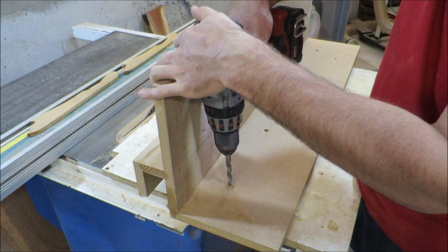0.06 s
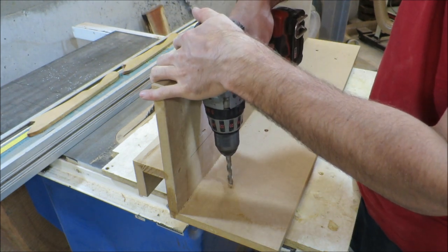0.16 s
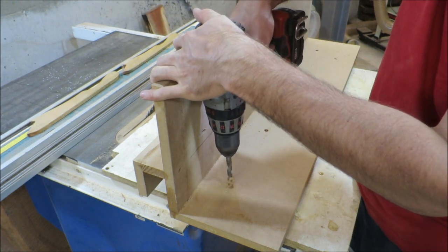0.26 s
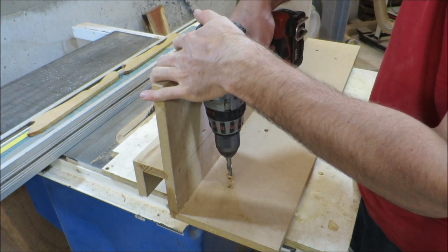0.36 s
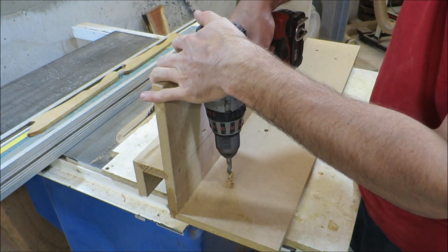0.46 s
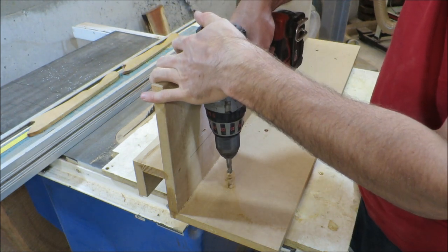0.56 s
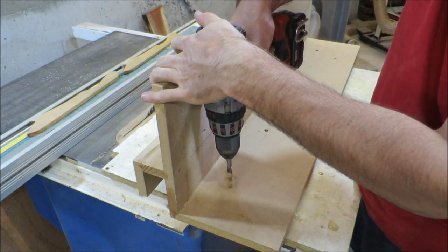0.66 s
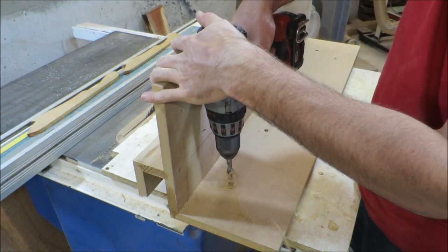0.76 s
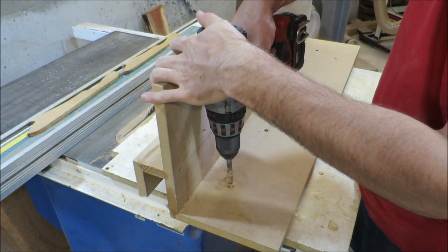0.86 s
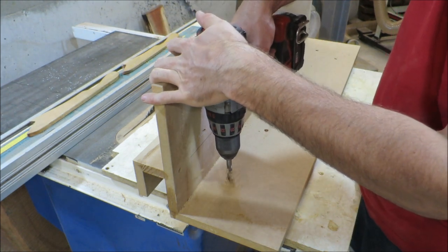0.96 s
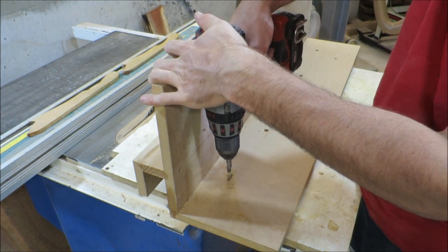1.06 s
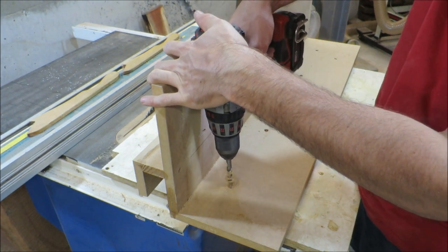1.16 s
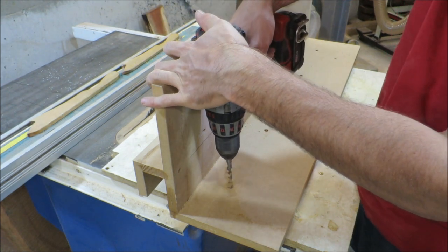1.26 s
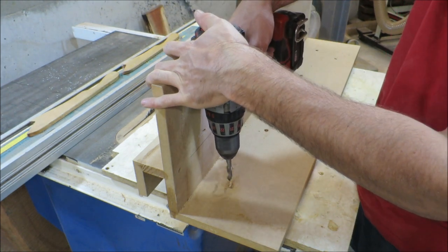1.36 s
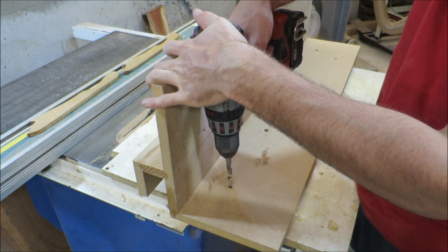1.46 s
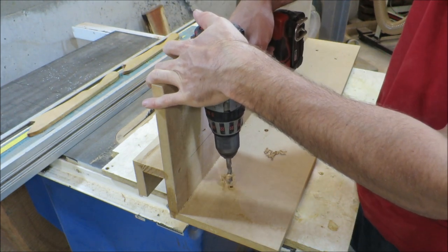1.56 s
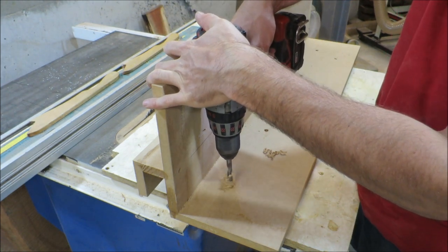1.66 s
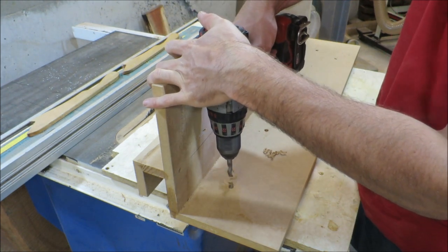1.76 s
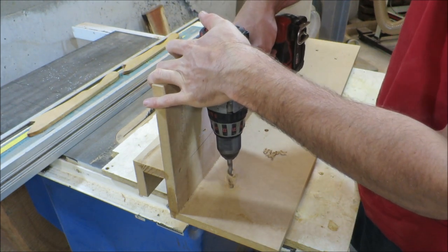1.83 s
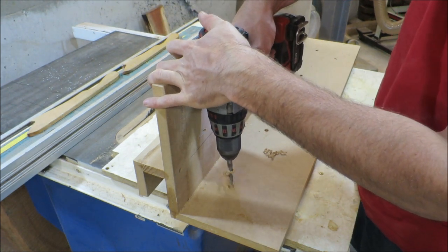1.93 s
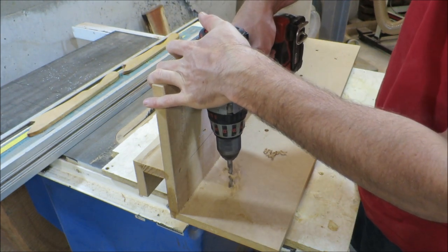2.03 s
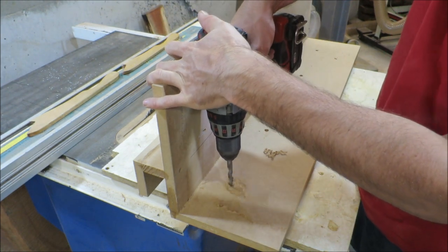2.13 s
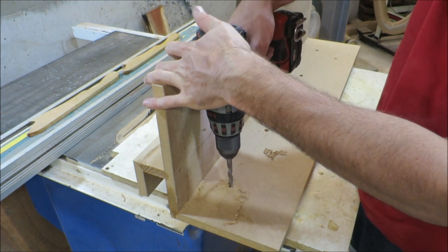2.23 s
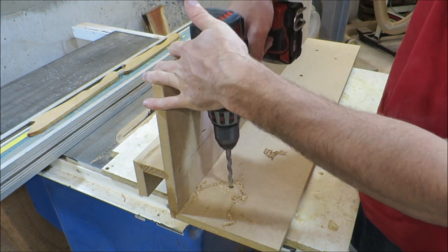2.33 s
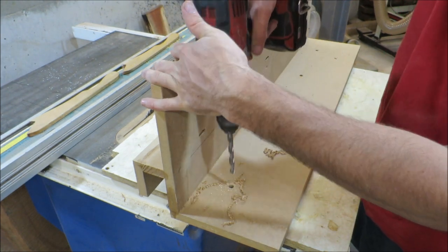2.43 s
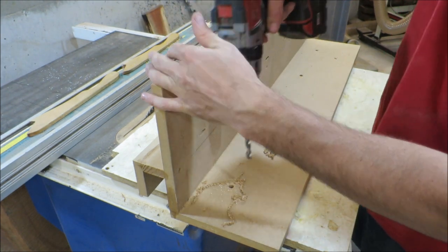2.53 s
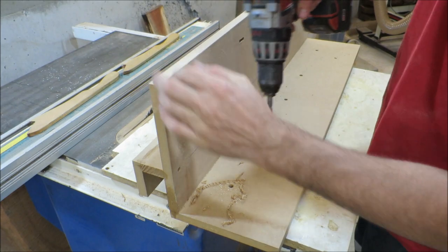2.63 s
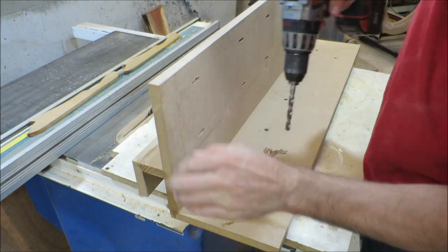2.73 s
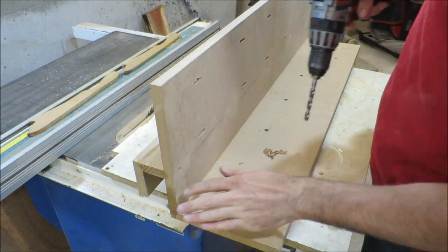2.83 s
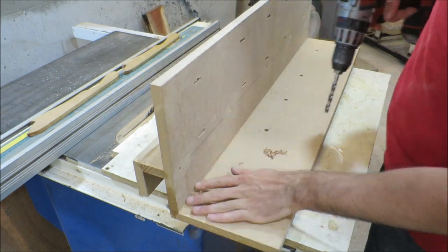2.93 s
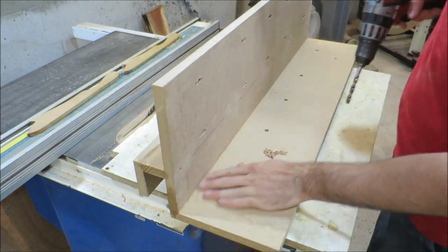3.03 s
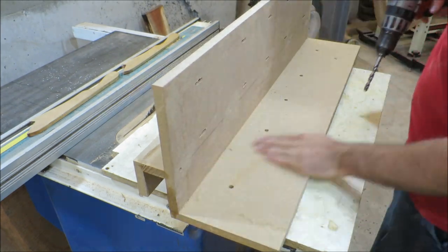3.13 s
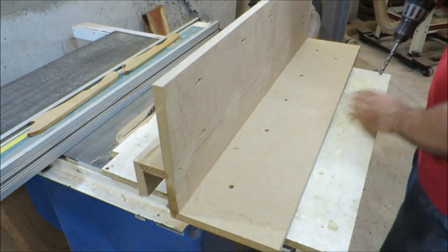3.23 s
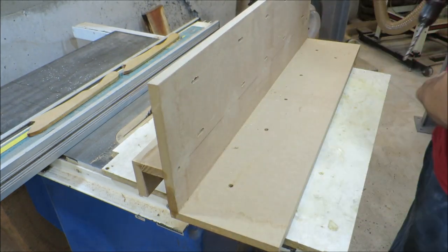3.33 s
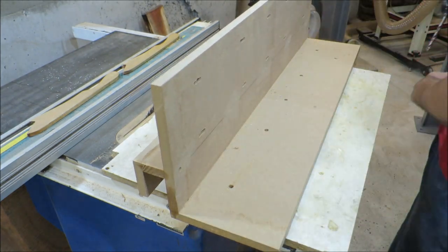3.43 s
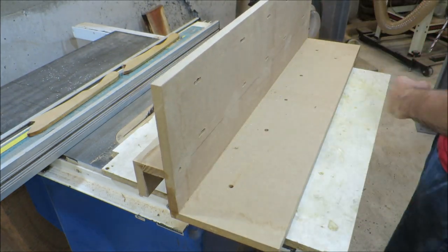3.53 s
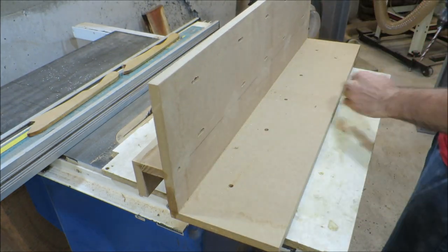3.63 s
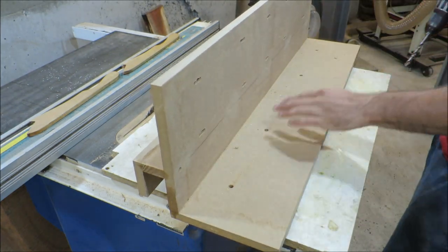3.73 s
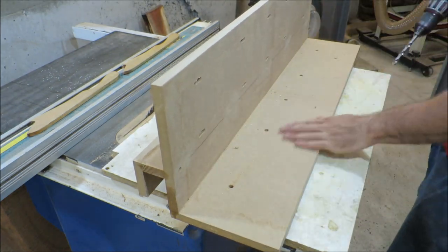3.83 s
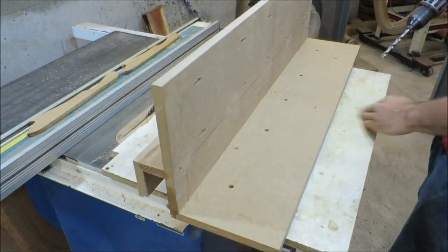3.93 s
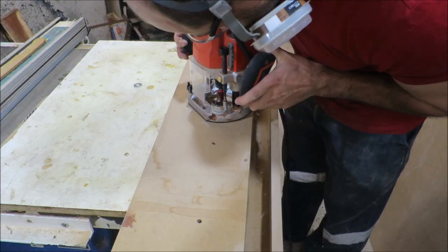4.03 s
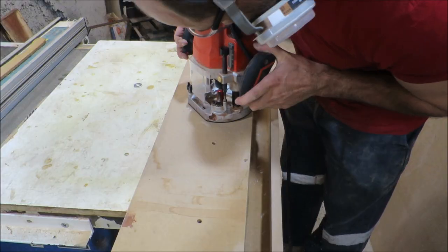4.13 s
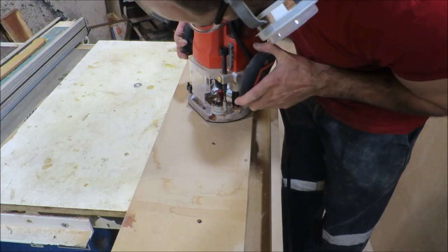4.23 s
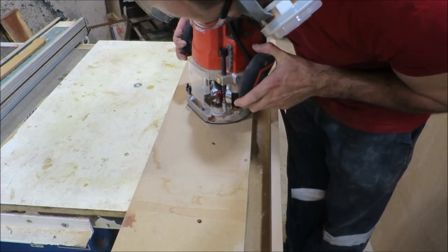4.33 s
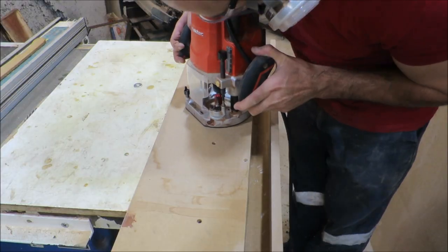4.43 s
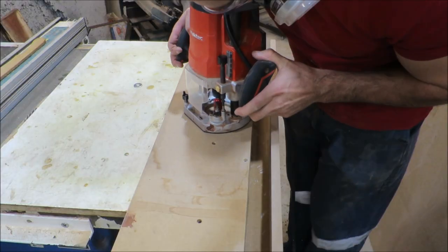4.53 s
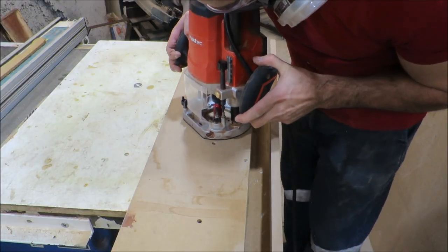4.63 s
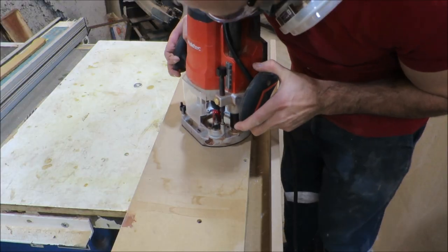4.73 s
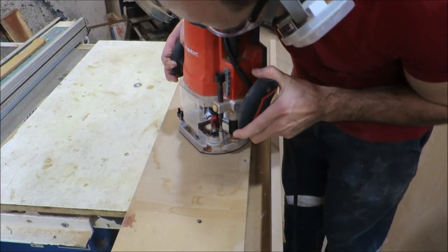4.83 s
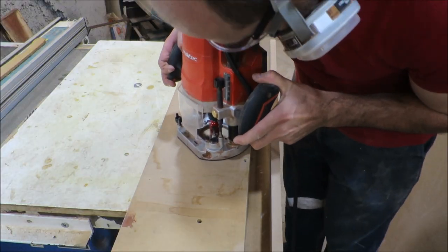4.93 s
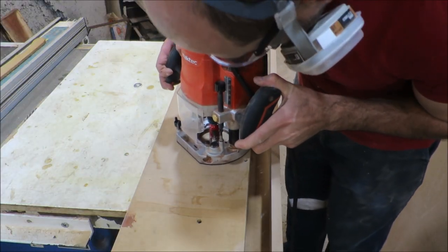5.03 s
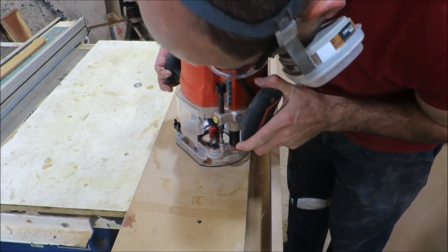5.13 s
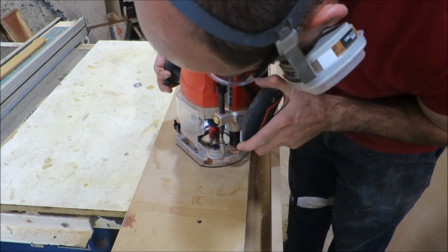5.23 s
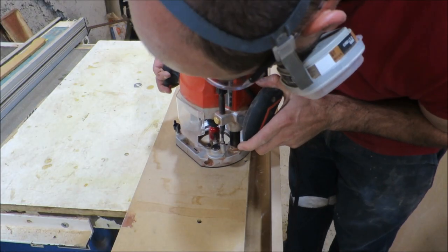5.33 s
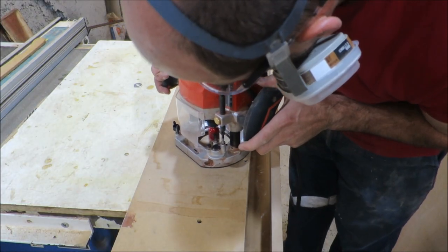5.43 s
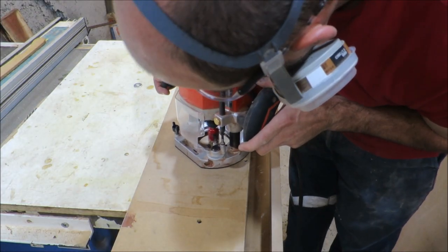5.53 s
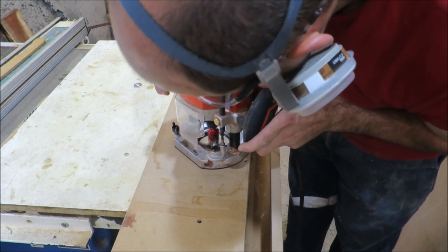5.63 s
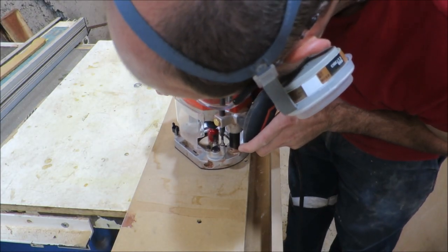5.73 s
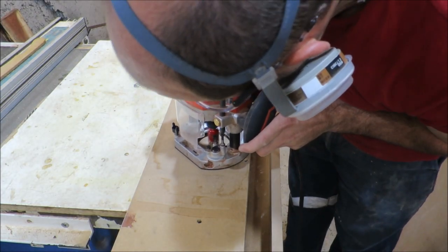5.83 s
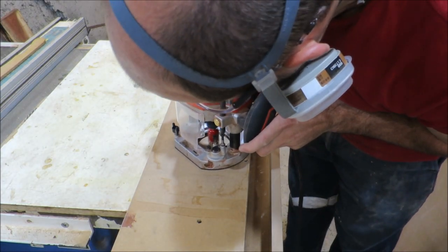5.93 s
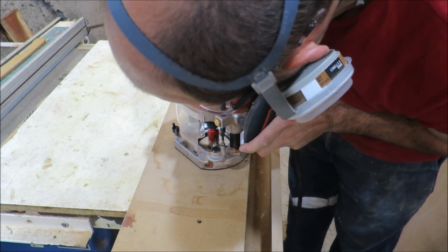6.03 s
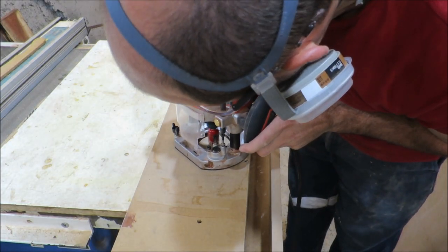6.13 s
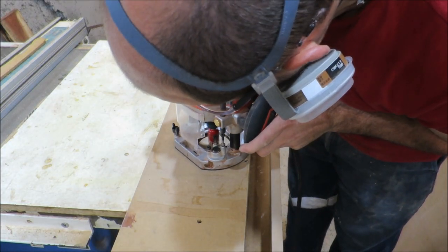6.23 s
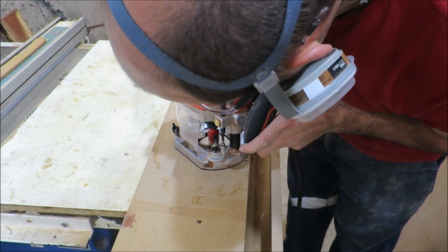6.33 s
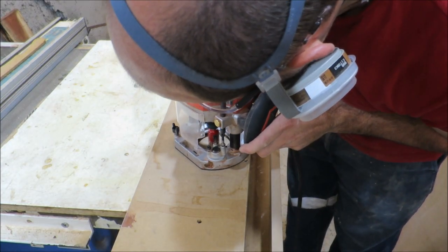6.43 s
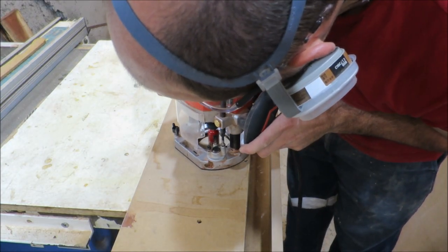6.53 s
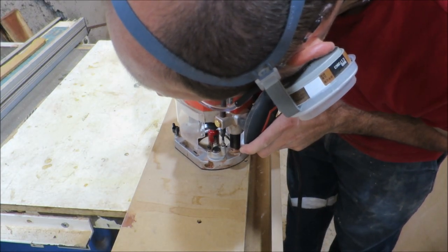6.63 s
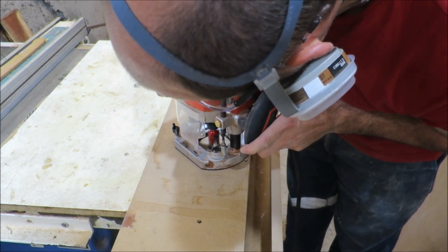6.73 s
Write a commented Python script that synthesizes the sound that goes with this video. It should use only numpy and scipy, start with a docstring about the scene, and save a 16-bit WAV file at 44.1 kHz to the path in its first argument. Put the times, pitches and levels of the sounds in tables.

```python
"""Cordless drill and plunge router

A drill bores into plywood, backs out and brakes: its gears whine at orders of the shaft speed while
the bit drives the board's modes. A palm slaps the board and wipes off the chips with a friction hiss.
The scene then cuts to a router, whose fan roars through resonant vents as its speed creeps up.
Both tools are heard close by, in stereo, in a workshop."""
import sys
import numpy as np
from scipy import signal
from scipy.io import wavfile
from scipy.ndimage import uniform_filter1d

SR = 44100
rng = np.random.default_rng(int(sys.argv[2]) if len(sys.argv) > 2 else 0)


def generate_wav(signal):
    """Clip the signal to [-1, 1] and save it as 16-bit WAV at the path in sys.argv[1]."""
    frames = np.transpose(np.atleast_2d(signal))
    scaled = np.clip(frames, -1, 1) * 32767
    pcm = np.round(scaled).astype(np.int16)
    wavfile.write(sys.argv[1], SR, pcm)


N = 298557
CUT_S = 4.149  # the router scene begins
FRAME, HOP = 2048, 512

# Stereo images, two lists each: (f/Hz, side minus mid/dB) and (f/Hz, left minus right/dB)
AT_DRILL = [(60, -17), (120, -16), (240, -16), (480, -17.5), (950, -14), (1890, -19.5), (3770, -18),
            (7520, -5), (15000, -2.5)], [(60, 0.0), (240, -2), (950, -0.5), (3770, -0.5), (15000, -0.5)]
AT_ROUTER = [(60, -18), (120, -31), (240, -15), (480, -19), (950, -11.5), (1890, -22), (3770, -11.5),
             (7520, -5), (15000, -1)], [(60, 0.0), (240, -1.1), (950, -0.7), (3770, -0.42), (15000, -0.5)]
AT_HAND = [(60, -9), (180, 9), (550, 5), (1650, -9), (4970, -9), (15000, 1)], [(60, 0.0), (380, -1.0),
           (2380, -0.54), (15000, -0.5)]

# Run of the drill motor: t/s, shaft f/Hz, boost of the strong orders/dB
MOTOR = [(0.0, 350, -1), (0.05, 351, 0.5), (0.2, 353.9, 0), (0.38, 350, -1), (0.58, 350.3, -0.5),
         (0.73, 355, -1.5), (1.11, 365.0, 0.5), (1.22, 373.4, 0.5), (1.45, 404.4, -3), (1.56, 416.2, -0.5),
         (1.77, 425.4, 1.5), (1.85, 424.2, 1.5), (1.89, 421, 1.5), (2.05, 392.6, 2), (2.15, 387.4, -1.5),
         (2.26, 385.2, 0), (2.41, 402, -2.5), (2.44, 401.9, 0), (2.47, 387.3, 7.5), (2.51, 360.9, 5),
         (2.528, 345.0, 4), (2.61, 305, 1)]
# Strong orders: multiple of the shaft speed
WHINE_ORDERS = (5, 10, 13, 15, 17, 20, 22, 25, 27)
# Each strong order off resonance: level/dB
WHINE_DB = (-41.5, -43, -44.5, -37.5, -42, -40.5, -42, -42.5, -44)
# Weaker gear and armature tones: order, level/dB
GEAR_TONES = [(4, -52.5), (7, -48.5), (8, -46.5), (8.5, -44), (9, -46.5), (9.5, -44), (10.5, -47.5),
              (12, -42.5), (12.5, -51.5), (13.5, -45), (14, -42.5), (14.5, -44), (15.5, -41.5), (16, -40.5),
              (16.5, -55), (17.5, -54), (18.5, -44), (19.5, -52), (20.5, -47), (21, -45.5), (22.5, -40),
              (23, -47), (23.5, -41), (25.5, -44.5), (26, -43.5), (27.5, -44.5), (28, -45), (30, -50),
              (32, -46.5), (33.5, -51), (37, -75)]
# Envelope of all other whole and half orders: order, level/dB
ORDER_FLOOR = [(3, -58), (10, -56.5), (16, -53), (24, -49), (35, -47), (44, -51)]
# Resonances of the drill's shell: f/Hz, width/Hz, boost/dB
SHELL_MODES = [(1607, 94, 11), (1759, 8, 9.5), (2079, 75, 10), (3493, 62, 10.5), (4001, 140, 13.5),
               (5320, 290, 8.5), (5674, 250, 12.5), (5978, 320, 10), (6313, 200, 4), (6986, 35, 10.5),
               (8060, 330, 6.5), (8800, 380, 5), (9410, 120, 11), (10750, 660, 9)]
def drill_whine():
    """Gear meshing: shaft orders swell at resonances; a gear repeating every second turn adds halves."""
    t = np.arange(round(MOTOR[-1][0] * SR)) / SR
    shaft_hz, boost_db = curves(MOTOR, t)
    shaft_hz = uniform_filter1d(shaft_hz, size=1300)  # the rotor's inertia rounds every change
    slowing_hz_per_s = np.clip(-uniform_filter1d(np.gradient(shaft_hz) * SR, size=1500), 0, 600)
    coast_db = -slowing_hz_per_s / 60  # tones sink as the motor coasts
    rattle = .22 + slowing_hz_per_s / 1400  # unloaded gears chatter and smear their tones
    wavers_db = 1.5 * np.real(drift(t, per_s=12, count=len(WHINE_DB)))
    whine = 0
    for order, db, waver_db in zip(WHINE_ORDERS, WHINE_DB, wavers_db):
        hz = order * shaft_hz
        level_db = db + boost_db + .05 * order * coast_db + waver_db + swell_db(SHELL_MODES, hz)
        whine += tone(t, hz, level_db, AT_DRILL, diffuse=rattle, per_s=70)
    weak_db = dict(GEAR_TONES)
    for order in np.arange(2 * ORDER_FLOOR[0][0], 2 * ORDER_FLOOR[-1][0]) / 2:
        if order not in WHINE_ORDERS and order * shaft_hz.max() < .45 * SR:
            weak_db.setdefault(order, spectrum(ORDER_FLOOR, order) + 2 * (order % 1 == 0))
    for order, db in weak_db.items():
        hz = order * shaft_hz
        level_db = db + coast_db + .15 * swell_db(SHELL_MODES, hz)
        whine += tone(t, hz, level_db, AT_DRILL, diffuse=.78, per_s=12.2)
    low_hz = 1.5 * shaft_hz  # heard only while it meets a mode of the board
    low_tone = tone(t, low_hz, coast_db - 57.5, AT_DRILL, diffuse=.32)
    whine += resonances(BOARD_MODES[1:2], low_hz) * low_tone
    fade_out = np.clip((t[-1] - t) / .013, 0, 1)
    return starting_at(0, whine * fade_out)


# Last whine under braking: t/s, f/Hz, level/dB
BRAKE_GLIDE = [(2.6, 1518, -40), (2.612, 1437, -46), (2.63, 765, -36), (2.65, 704, -50), (2.7, 695, -67)]
def drill_brake():
    """Deceleration: pitch follows shaft speed, so braking gives a short falling glide."""
    t = np.arange(round(BRAKE_GLIDE[0][0] * SR), round(BRAKE_GLIDE[-1][0] * SR)) / SR
    glide = tone(t, *curves(BRAKE_GLIDE, t), AT_DRILL, diffuse=.86, per_s=68)
    return starting_at(t[0], glide * signal.windows.tukey(len(t), .2))


# Air and gear hiss: f/Hz, relative spectral level/dB
DRILL_HISS = [(410, -30), (700, -25), (873, -6.5), (1490, -5.5), (1610, 1.5), (2250, -4.5), (2700, -0.5),
              (4960, 0.5), (5800, -1), (7420, -4.5), (12600, -0.5), (14800, -17.5), (15600, -5)]
# Modes of the plywood board: f/Hz, width/Hz, level/dB
BOARD_MODES = [(267, 59, -9), (527, 71, 1.5), (847, 100, -8), (628, 560, -4.5), (370, 61, -7.5)]
# Growl of the bit rubbing in its hole: t/s, level/dB
BIT_FRICTION = [(0, -46.5), (1.1, -48), (1.21, -45), (1.35, -52.5), (1.75, -49), (1.95, -42), (2.02, -37),
                (2.27, -42), (2.45, -51.5), (2.63, -59)]
# Rumble of the bench: t/s, level/dB
BENCH_RUMBLE = [(0, -51), (.5, -53.5), (1.4, -60), (1.75, -57.5), (1.83, -60), (2.35, -59), (2.63, -63)]
def boring(stop_s=2.628, rundown_db_per_s=298):
    """Forced vibration: the bit shakes board and bench, under air and gear hiss pulsing once a turn."""
    hz, t = grid()[0], np.arange(N) / SR
    growl_db = curves(BIT_FRICTION, t)[0]
    load_db = growl_db + 46.5  # relative to the usual friction
    moan_db = -46.5 + 1.36 * load_db  # follows the growl, but swings wider
    hiss_db = -30 + .034 * load_db + 4 * np.exp(-t / .16)  # surges as the bit enters
    turns = np.cumsum(curves(MOTOR, t)[0]) / SR
    end_s = stop_s + .5
    hiss = noise(amp(spectrum(DRILL_HISS, hz)), AT_DRILL, patchy_db=1.5, until=end_s)
    hiss *= 1 + .14 * np.cos(2 * np.pi * turns)
    growl = noise(resonances(BOARD_MODES[2:], hz), AT_DRILL, patchy_db=2.5, until=end_s)
    moan = noise(resonances(BOARD_MODES[:2], hz), AT_DRILL, patchy_db=2.7, until=end_s)
    bench_response = resonances([(168.7, 17.5, -.2), (280, 95, -.8)], hz)
    rumble = amp(curves(BENCH_RUMBLE, t)[0]) * noise(bench_response, AT_DRILL, patchy_db=2, until=end_s)
    rundown = amp(-rundown_db_per_s * np.clip(t - stop_s, 0, 1))  # once the brake bites
    return rundown * (amp(hiss_db) * hiss + amp(growl_db) * growl + amp(moan_db) * moan + rumble)


# Fan roar with the worker upright: f/Hz, relative spectral level/dB
ROAR_UPRIGHT = [(24, -63), (40, -29), (260, -15.5), (351, -8.5), (485, -4.5), (671, -2.5), (905, -5.5),
                (1000, 4), (1350, 0), (1690, -2.5), (2450, 3), (2850, 0.5), (3230, 3), (12400, -4),
                (15600, -13.5)]
# Fan roar with the worker bent over the machine: f/Hz, relative spectral level/dB
ROAR_BENT_OVER = [(24, -70), (40, -55), (280, -16), (359, -18.5), (428, -14), (654, -10.5), (1350, -4.5),
                  (1450, -6), (1730, -7.5), (2520, -2.5), (4690, -5), (6030, -5), (9680, -10), (12400, -8),
                  (15600, -15.5)]
# The worker leans in: t/s, share of the bent-over spectrum (0-1)
LEANING = [(4.15, 0.06), (4.7, 0.2), (5.1, 0.4), (5.6, 0.68), (6.1, 0.8), (6.77, 0.45)]
# Fuzzy whistles of the housing vents: f/Hz, width/Hz, boost/dB
VENT_MODES = [(1080, 150, -1.5), (2470, 110, 2.5), (3145, 110, 3.5), (3740, 140, 2), (4795, 80, 4),
              (4800, 120, -5.5), (6930, 32, 9), (7600, 65, -12), (10430, 110, 3), (12600, 81, 5)]
# Router shaft orders 1 to 4: first level/dB, final level/dB
ROUTER_ORDERS = [(-55.5, -48), (-45.5, -50), (-43, -46), (-42.5, -39.5)]
# Narrow room resonances that swell the router's orders as its speed rises: f/Hz, width/Hz, boost/dB
ROOM_PEAKS = [(345.4, 9.1, 13), (361.7, 5.2, 6.5), (369, 4.5, 10), (703, 6.2, 0), (1367, 26, 4.5),
              (1414, 11, 8), (1456.4, 18, 7)]
def router(top_hz=371, start_gap_hz=36.7, spin_up_s=1.1):
    """Amplitude modulation: each turn and each chip beats the fan's roar; shaft orders hum below."""
    hz, frame_times = grid()
    lean = curves(LEANING, frame_times)[0]
    colour_db = (1 - lean) * spectrum(ROAR_UPRIGHT, hz) + lean * spectrum(ROAR_BENT_OVER, hz)
    colour = amp(colour_db + swell_db(VENT_MODES, hz))
    colour /= np.sqrt(np.mean(colour ** 2, axis=0))  # equal power in every frame
    elapsed = np.maximum(np.arange(N) / SR - CUT_S, 0)
    shaft_hz = top_hz - start_gap_hz * np.exp(-elapsed / spin_up_s)
    beat = 1 + .1 * np.cos(2 * np.pi * np.cumsum(shaft_hz) / SR)
    chip_sizes = amp(1.5 * np.minimum(rng.exponential(1, N), 4))
    snaps = chip_sizes * (rng.random(N) < 120 / SR)  # about 120 chips a second
    bursts = 1 + .19 * signal.oaconvolve(snaps, np.exp(-np.arange(120) / 25))[:N]
    roar = noise(colour, AT_ROUTER, patchy_db=.7) * unit_rms(beat * bursts)
    roar_db = -22.5 - 2.5 * np.exp(-elapsed / .25)  # starts a little low
    hum = 0
    for order, (first_db, final_db) in enumerate(ROUTER_ORDERS, start=1):
        order_hz = order * shaft_hz
        ramp_db = first_db + (final_db - first_db) * elapsed / elapsed[-1]
        level_db = ramp_db + swell_db(ROOM_PEAKS, order_hz)
        hum += tone(np.arange(N) / SR, order_hz, level_db, AT_ROUTER, diffuse=.42, per_s=18)
    return amp(roar_db) * roar + hum


# Palm strokes: start t/s, rise/s, hold/s, fall/s, hiss level/dB, treble re hiss/dB, rasp re hiss/dB,
# rub level/dB, bench bump level/dB
STROKES = [(3.07, 0.048, 0.066, 0.046, -68, 2, -1, -65, -77),
           (3.1, 0.15, .15, .03, -48, 5, -8.5, -60.5, -71),
           (3.414, 0.01, .012, 0.092, -44, -1, -16, -47, -54),
           (3.57, .11, 0.063, 0.12, -49.5, -4, -2.5, -70, -68),
           (3.93, 0.017, 0.013, .02, -61.5, -6, -6, -67, -70),
           (3.964, 0.036, 0.087, 0.045, -43.5, 1.5, -10, -61, -52.5),
           (4.105, 0.016, .03, .02, -44, -9, -12, -63, -55)]
# Skin sliding on plywood: f/Hz, relative spectral level/dB
PALM_HISS = [(530, -39), (900, -11), (1290, -5), (1520, -13), (1980, -6), (3110, -2), (7340, -4.5),
             (12400, -2), (15600, -10)]
def wiping():
    """Sliding friction: skin and chips give a gritty hiss while board and bench resonate dully."""
    hz, t = grid()[0], np.arange(N) / SR
    skin = wood = 0
    for start, rise, hold, fall, hiss_db, treble_db, rasp_db, rub_db, bump_db in STROKES:
        skin += amp(hiss_db + np.array([[0], [treble_db], [rasp_db]])) * stroke(t, start, rise, hold, fall)
        wood += amp([[rub_db], [bump_db]]) * stroke(t, start, rise, hold, 2.1 * fall)  # wood lingers
    (hiss_gain, dust_gain, rasp_gain), (rub_gain, bump_gain) = skin, wood
    grit = unit_rms(amp(.71 * unit_rms(uniform_filter1d(rng.standard_normal(N), size=60))))
    high = 1 / (1 + (6000 / (hz + 1)) ** 6)  # power share of the fine dust's treble
    low = 1 / (1 + (hz / 2300) ** 6)  # power share taken out of the hiss
    palm = amp(spectrum(PALM_HISS, hz))
    hiss = noise(palm * np.sqrt((1 - high) * (1 - low)), AT_HAND, patchy_db=1.2, until=CUT_S)
    dust = noise(palm * np.sqrt(high), AT_HAND, patchy_db=1.2, until=CUT_S)
    coarse_chips = resonances([(1780, 1400, 0), (1130, 500, -5)], hz)
    rasp = noise(coarse_chips, AT_HAND, patchy_db=.8, until=CUT_S)
    rub = noise(resonances([(353, 250, -3), (595, 640, 1)], hz), AT_DRILL, patchy_db=2, until=CUT_S)
    bump = noise(resonances([(176, 92, -2), (263, 110, 0)], hz), AT_DRILL, patchy_db=1.8, until=CUT_S)
    friction = hiss_gain * hiss + dust_gain * dust + rasp_gain * rasp
    return grit * friction + rub_gain * rub + bump_gain * bump


# The palm lands on the board: t/s, thud level/dB
PALM_IMPACTS = [(3.421, -37), (3.439, -38), (3.979, -45), (4.001, -39), (4.117, -41)]
def slaps(tick_db=-48):
    """Impulse response: a soft blow favours the board's low modes, which decay under a short tick."""
    t, mid = np.arange(3000) / SR, np.zeros(N)
    ring = sum(amp(db) * (300 / hz) ** 2 * np.exp(-np.pi * width * t) * np.sin(2 * np.pi * hz * t)
               for hz, width, db in BOARD_MODES)
    ring *= 1 - np.exp(-t / .00048)  # soft onset
    ring /= abs(ring).max()
    for start, thud_db in PALM_IMPACTS:
        tick = np.diff(rng.standard_normal(len(t)), prepend=0) * np.exp(-t / .0039)
        mid[round(start * SR):][:len(t)] += amp(thud_db) * ring + amp(tick_db) * tick
    return np.array([mid, amp(-12) * np.roll(mid, 30)])


# Quiet air of the workshop: f/Hz, relative spectral level/dB
ROOM_AIR = [(18, -24), (30, -6), (97, -4.5), (123, -17), (263, -8.5), (300, -13), (410, -11), (710, -12),
            (4920, -20), (14400, -31.5), (15600, -31)]
# Low wavering hum: t/s, level/dB
ROOM_HUM = [(0, -63), (.4, -59), (1.05, -71.5), (1.4, -60), (1.7, -71), (1.95, -52), (2.35, -60),
            (2.66, -89), (3.1, -77), (3.6, -59), (3.9, -72), (4.07, -59)]
def workshop(air_db=-61, hum_hz=68.5):
    """Ambient noise: the room's broadband air is superposed on one low tone."""
    hz, t = grid()[0], np.arange(N) / SR
    hum = tone(t, np.full(N, hum_hz), curves(ROOM_HUM, t)[0], AT_DRILL, diffuse=.8, per_s=7.4)
    air = noise(amp(spectrum(ROOM_AIR, hz)), AT_HAND, patchy_db=1.8, until=CUT_S)
    return amp(air_db) * air + hum


def walls(mid_side, t60, wet_db):
    """Reverberation: sparse random reflections smear tones while they glide."""
    taps = np.zeros((2, 600, 20))  # one reflection in every 20 samples
    np.put_along_axis(taps, rng.integers(0, 20, (2, 600, 1)), rng.choice([-1., 1.], (2, 600, 1)), axis=2)
    taps = taps.reshape(2, -1) * amp(-60 * np.arange(12000) / SR / t60)
    taps[:, :200] = 0  # the nearest surface is a few milliseconds away
    tail = signal.oaconvolve(mid_side, taps / np.linalg.norm(taps[0]), axes=1)[:, :N]
    return mid_side + amp(wet_db) * tail


def tone(t, hz, db, place, diffuse, per_s=9):
    """Interference: reflections make a sine fade and wander in mid and side."""
    phasor = np.exp(2j * np.pi * (np.cumsum(hz) / SR + rng.random()))
    fade, wander = drift(t, per_s, count=2)
    mid = np.sqrt(1 - diffuse ** 2) + diffuse * fade
    side = side_signal(place, hz.mean(), mid, wander)
    return np.sqrt(2) * amp(db) * np.real(phasor * np.array([mid, side]))


def noise(shape, place, patchy_db, until=np.inf):
    """Spectral shaping: mid and side noise with drifting patches, up to a time; the mid has rms 1."""
    hz, t = grid()
    frames = int(min(len(t), until * SR / HOP + 5))
    a, b, c, d, patches = rng.standard_normal((frames, len(hz), 5), dtype=np.float32).T
    patches = unit_rms(uniform_filter1d(uniform_filter1d(patches, size=24, axis=0), size=6, axis=1))
    mid = a + 1j * b
    side = side_signal(place, hz, mid, c + 1j * d)
    spectra = np.array([mid, side]) * shape * amp(patchy_db * patches)
    out = signal.istft(spectra.astype(np.complex64), nperseg=FRAME, noverlap=FRAME - HOP)[1]
    return np.pad(out / np.sqrt(np.mean(out[0] ** 2)), ((0, 0), (0, N)))[:, :N]


def side_signal(place, hz, mid, incoherent):
    """Stereo imaging: an incoherent part gives width, a share of the mid makes one channel louder."""
    width, balance = place
    pan = np.tanh(spectrum(balance, hz) * np.log(10) / 40)
    return amp(spectrum(width, hz)) * incoherent + pan * mid


def drift(t, per_s, count):
    """Random modulation: count rows of low-passed complex noise, rms about 1."""
    knots = np.arange(t[0], t[-1] + 1, 1 / 200)
    white = rng.standard_normal((len(knots), count)) + 1j * rng.standard_normal((len(knots), count))
    slow = unit_rms(signal.lfilter(*signal.butter(2, per_s / 100), white, axis=0)[100:])
    return [np.interp(t, knots[:len(slow)], row) for row in slow.T]


def stroke(t, start, rise, hold, fall, range_db=23):
    """Exponential growth and decay around a hold: the gain of one wipe."""
    before = np.maximum(start + rise - t, 0) / rise
    after = np.maximum(t - start - rise - hold, 0) / fall
    return amp(-range_db * np.minimum(np.maximum(before, after), 4))


def resonances(modes, hz):
    """Power summation of modes (f/Hz, width/Hz, level/dB), as a gain."""
    return np.sqrt(sum(amp(2 * db) / (1 + (2 * (hz - f) / width) ** 2) ** 2 for f, width, db in modes))


def swell_db(modes, hz):
    """Resonant boost: a sum of Lorentzian peaks, in dB."""
    return sum(db / (1 + (2 * (hz - f) / width) ** 2) for f, width, db in modes)


def spectrum(points, hz):
    """Interpolation on a log-frequency axis."""
    f, value = np.transpose(points)
    return np.interp(np.log(hz + 1), np.log(f + 1), value)


def curves(rows, t):
    """Linear interpolation of each column at the times t."""
    times, *columns = np.transpose(rows)
    return [np.interp(t, times, column) for column in columns]


def grid():
    """Bin frequencies as a column and frame times as a row."""
    return np.fft.rfftfreq(FRAME, 1 / SR)[:, None], np.arange(N // HOP + 5) * HOP / SR


def starting_at(start_s, mid_side):
    """Time delay, padded to N samples."""
    return np.pad(mid_side, ((0, 0), (round(start_s * SR), N)))[:, :N]


def amp(db):
    """Decibels to gain."""
    return 10 ** (np.asarray(db) / 20)


def unit_rms(x):
    """Normalisation to rms 1."""
    return x / np.sqrt(np.mean(abs(x) ** 2) + 1e-20)


def scene():
    """Superposition: the drill scene cuts to the router; mid and side become left and right."""
    whine = walls(drill_whine() + drill_brake(), t60=.25, wet_db=-12)
    drill_scene = whine + boring() + wiping() + slaps() + workshop()
    cut = np.clip((np.arange(N) / SR - CUT_S) / .002, 0, 1)
    mid, side = (1 - cut) * drill_scene + cut * router()
    return np.array([mid + side, mid - side])


def record(dry):
    """Band limiting: the microphone cuts the bass below 45 Hz and the treble above 15.7 kHz."""
    thin = signal.sosfilt(signal.butter(3, 45., "high", fs=SR, output="sos"), dry)
    low_pass = signal.firwin(1023, 15700, window=("kaiser", 9), fs=SR)
    return signal.oaconvolve(thin, low_pass[None], "same")


dry = scene()
out = record(dry)
generate_wav(out)
```